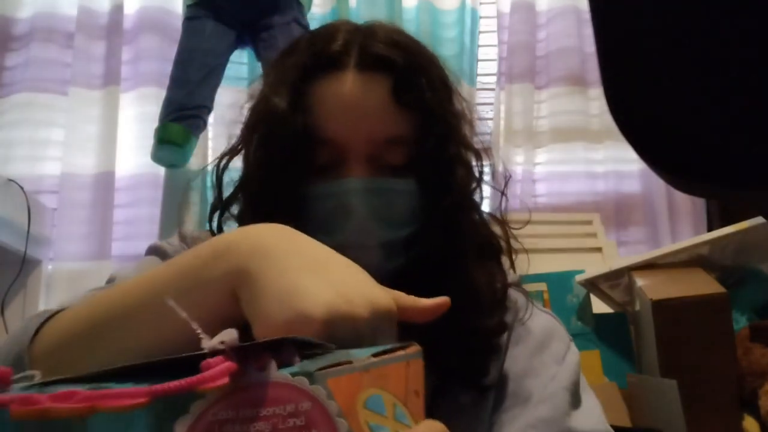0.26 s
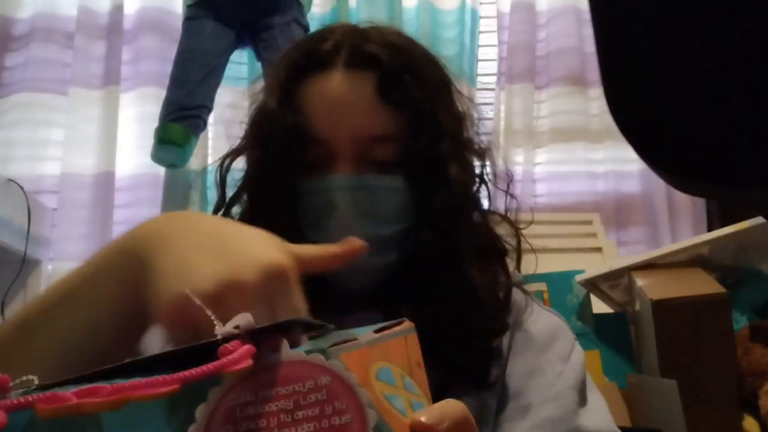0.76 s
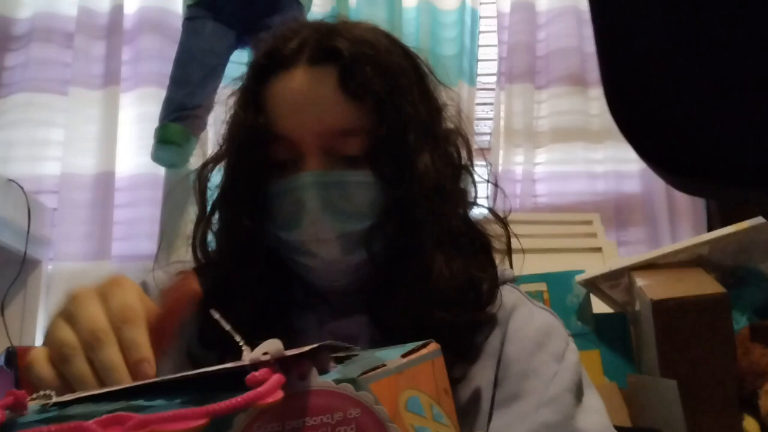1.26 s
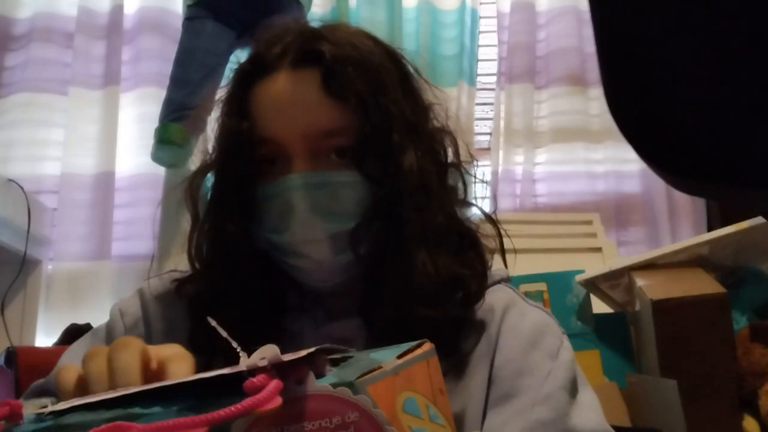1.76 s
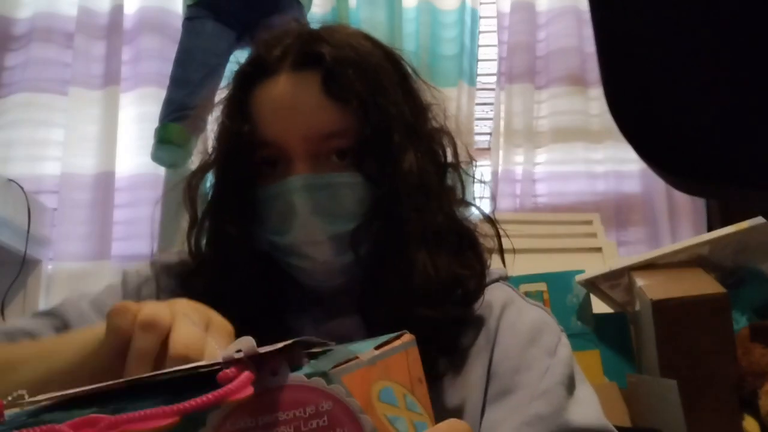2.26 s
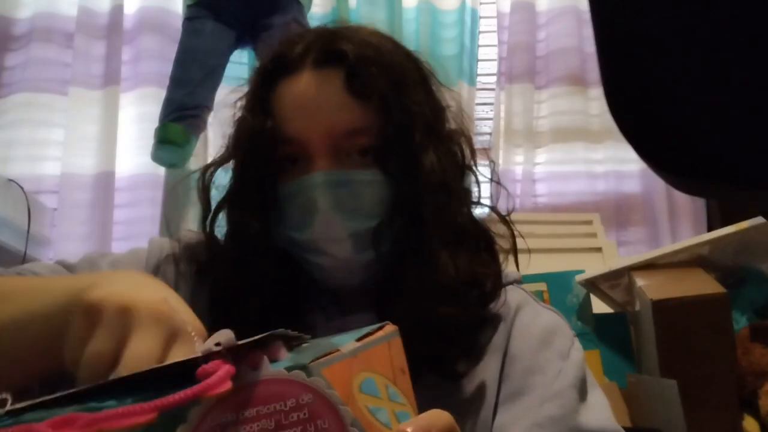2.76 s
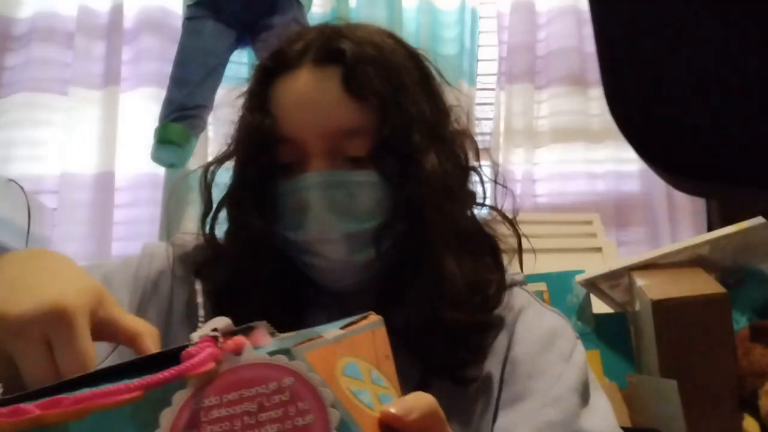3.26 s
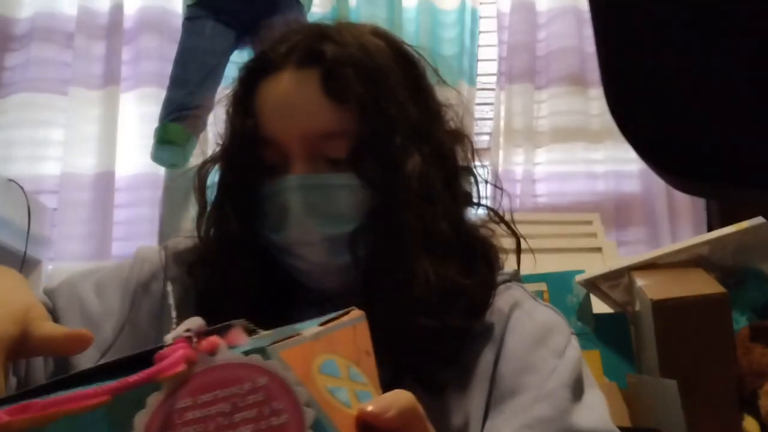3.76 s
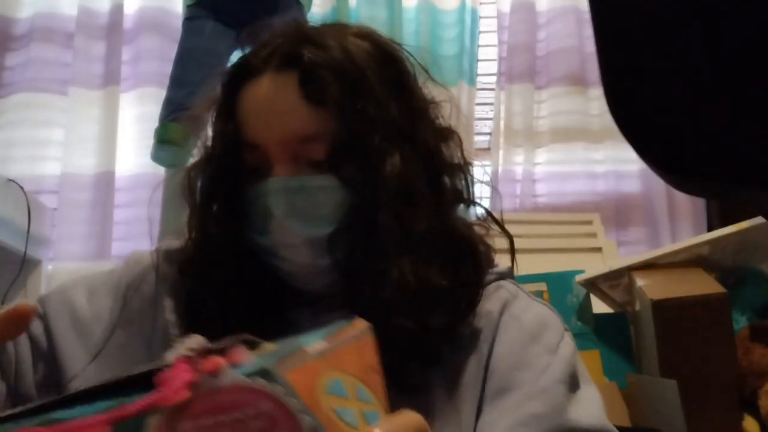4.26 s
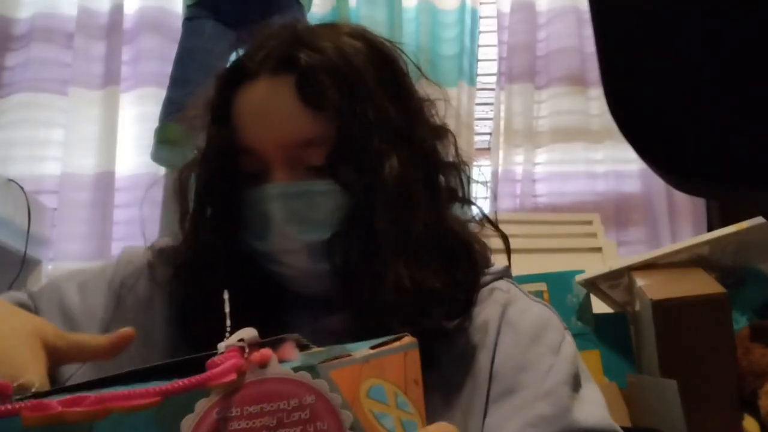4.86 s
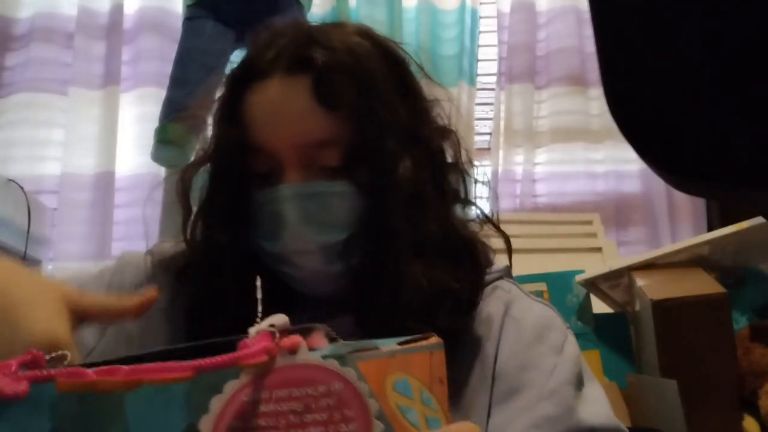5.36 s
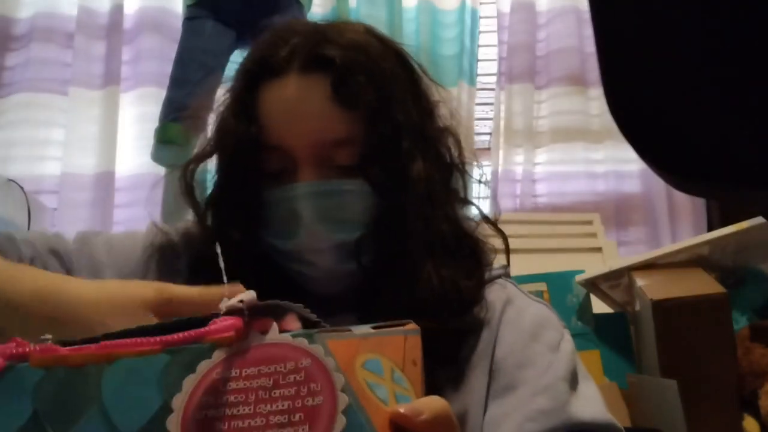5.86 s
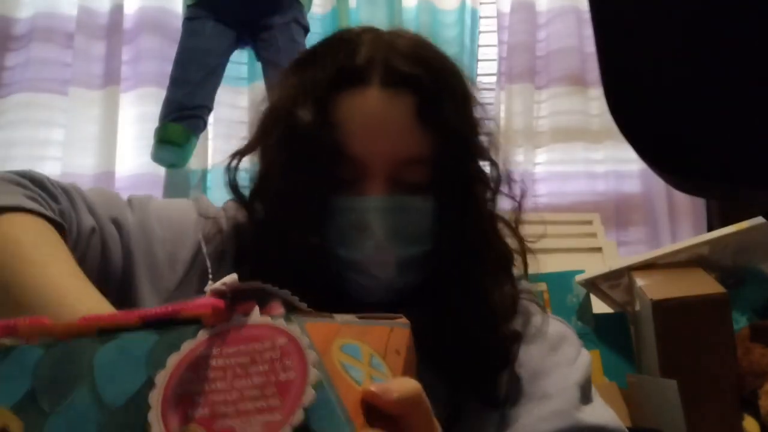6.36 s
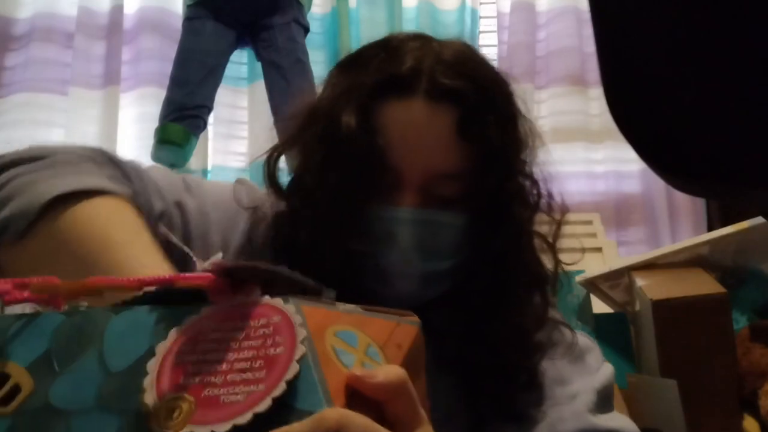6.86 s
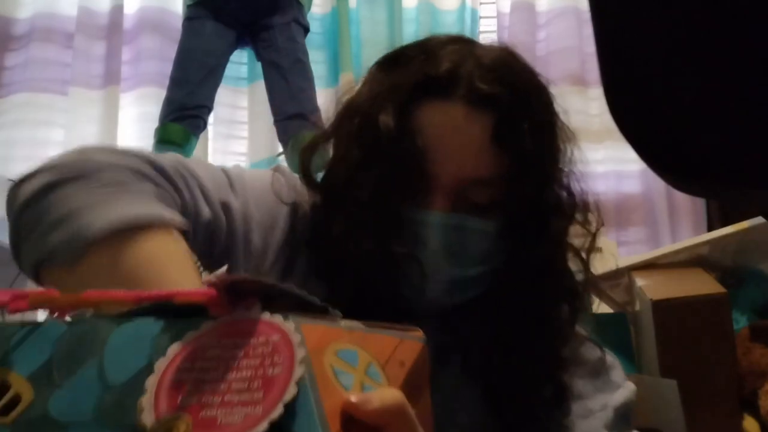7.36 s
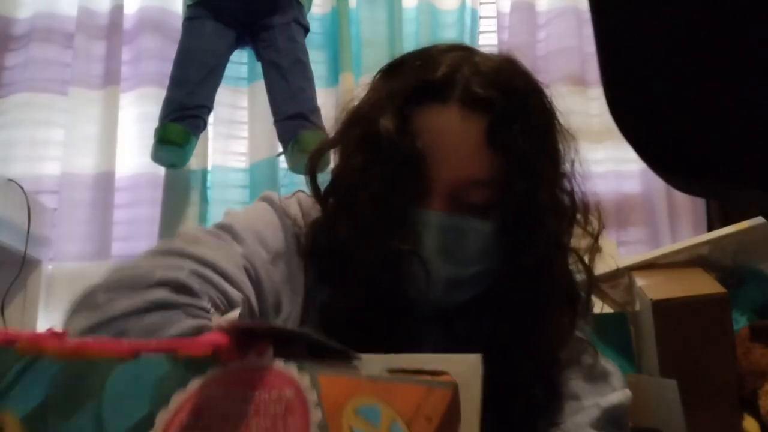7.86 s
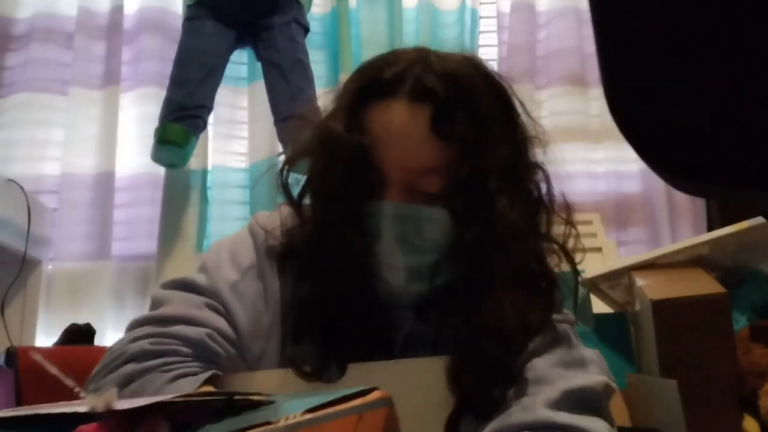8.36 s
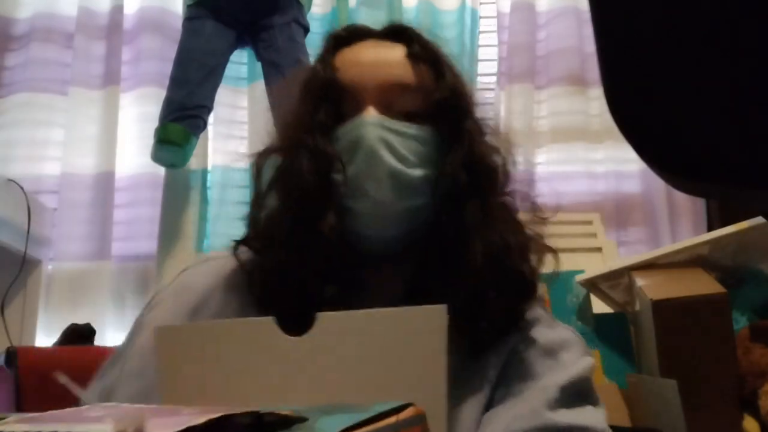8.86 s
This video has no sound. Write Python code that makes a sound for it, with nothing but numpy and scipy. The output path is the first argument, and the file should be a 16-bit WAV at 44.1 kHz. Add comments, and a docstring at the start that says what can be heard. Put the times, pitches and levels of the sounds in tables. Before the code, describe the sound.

Close indoors, fingers tap, scrape and snap a hollow cardboard box, then rip its tab and pull it open with a loud coarse tear.

```python
"""A small, furnished room: a cardboard toy box is opened by hand close to the microphones.
Fingers tap and scrape the card, its tab gives way in snaps and short rips, and the inner tray slides out.
Snaps and taps are bursts of tiny breaks; strokes are random slips over hissing, rubbing fibres.
Both sound through the whole box, the air in it, its walls, its stiff panels and its surface fibres."""
import sys
import numpy as np
from scipy import signal
from scipy.fft import rfft, irfft, next_fast_len
from scipy.io import wavfile
from scipy.ndimage import map_coordinates

SR = 44100
rng = np.random.default_rng(int(sys.argv[2]) if len(sys.argv) > 2 else 0)


def log_audio(samples):
    """Write samples as a 16-bit WAV file to the path given in sys.argv[1]."""
    # one column per channel
    frames = np.atleast_2d(samples).T
    # limit to full scale, then quantise
    limited = np.clip(frames, -1, 1)
    pcm = np.round(limited * 32767).astype(np.int16)
    wavfile.write(sys.argv[1], SR, pcm)


N = 402191
RING = 10000  # length of every response (samples)


def amp(db):
    """Gain of a level in dB."""
    return 10 ** (np.asarray(db) / 20)


def unit(x):
    """x at rms 1."""
    return x / np.sqrt(np.mean(x ** 2) + 1e-20)


def along(points, hz):
    """Curve through (f/Hz, value) points, read on a log frequency axis."""
    f, v = np.transpose(points)
    return np.interp(np.log(hz + 1), np.log(f + 1), v)


def wobble(rate, size):
    """A smooth random curve with rate knots a second."""
    knots = rng.standard_normal(int(size * rate / SR) + 4)
    return map_coordinates(knots, [np.arange(size) * rate / SR])


def filtered(x, response):
    """x times a response of frequency."""
    size = next_fast_len(x.shape[-1] + RING)
    spectrum = rfft(x, size) * response(np.fft.rfftfreq(size, 1 / SR))
    return irfft(spectrum, size)[..., :x.shape[-1]]


def causal(gain):
    """The minimum-phase response with this gain, by folding its cepstrum onto positive times."""
    cepstrum = irfft(np.log(np.maximum(gain, 1e-6)))
    cepstrum[1:RING // 2] *= 2
    cepstrum[RING // 2 + 1:] = 0
    return np.exp(rfft(cepstrum))


# spectrum of the still room: (f/Hz, level/dB)
AIR_TONE = [(25, -31), (50, -6.5), (90, 1), (185, -8), (363, -10.5), (840, -17), (1900, -21), (2800, -21),
            (7300, -30.5), (15500, -35)]


def air():
    """The still room is steady shaped noise, nearly the same at both microphones in the bass."""
    noise = rng.standard_normal((2, N))
    mid, side = unit(filtered(noise, lambda hz: amp(along(AIR_TONE, hz))))
    side_db = [(100, -9.5), (400, -3), (1500, -0.5)]  # (f/Hz, level/dB)
    side = filtered(side, lambda hz: amp(along(side_db, hz)))
    return amp(-70.5) * np.array([mid, side])


def resonator(modes, hz, edge_hz):
    """Gain of a set of modes that fades away below the lowest one and above an edge."""
    power = 0
    for centre, width, db in modes:
        mode = amp(db) * hz * width / (centre * centre - hz * hz + 1j * hz * width)
        power = power + np.abs(mode) ** 2
    below = (0.9 * modes[0][0] / (hz + 1)) ** 12
    above = (hz / edge_hz) ** 8
    return np.sqrt(power / (1 + above) / (1 + below))


# the push of a finger on the whole box: (f/Hz, level/dB)
THUMP_TONE = [(25, -21.5), (45, -20.5), (65, 0), (100, -2), (135, 1), (190, 6), (235, -17.5), (700, -73)]
# resonances of the air in the box: (f/Hz, width/Hz, level/dB)
CAVITY_MODES = [(297.4, 87, 1.5), (316, 33, -5.5), (389, 57, -1), (417, 42, -4.5), (493, 12, -1.5)]
# resonances of its large walls: (f/Hz, width/Hz, level/dB)
WALL_MODES = [(619.4, 51, -1.5), (683.5, 39, 1), (714, 14, -2.5), (779, 69, -1), (1121, 160, -6.5)]
# tone of the stiff panels: (f/Hz, level/dB)
PANEL_TONE = [(500, -47.5), (950, -1.5), (1120, 9), (1260, -0.5), (1370, 2), (1520, 2), (1640, -1.5),
              (1850, 1.5), (2150, 0.5), (2450, 1.5), (3200, -6), (4200, -22.5), (6000, -34.5),
              (12000, -62.5)]
# tone of the fibres at the surface: (f/Hz, level/dB)
FIBRE_TONE = [(1800, -45.5), (3500, 7), (5000, 5), (8000, 1), (11500, -3.5), (15000, -2.5)]


def radiators():
    """Responses of the five parts: whole box, the air in it, its walls, its panels and its fibres."""
    hz = np.fft.rfftfreq(RING, 1 / SR)
    thump, panel, fibre = (amp(along(tone, hz)) for tone in (THUMP_TONE, PANEL_TONE, FIBRE_TONE))
    cavity = resonator(CAVITY_MODES, hz, edge_hz=568)
    walls = resonator(WALL_MODES, hz, edge_hz=1023)
    return np.array([causal(gain) for gain in (thump, cavity, walls, panel, fibre)])


# how long the room's tail takes to fall by 60 dB: (f/Hz, time/s)
ROOM_DECAY = [(100, 0.21), (260, 0.33), (700, 0.11), (2000, 0.15), (5000, 0.14), (13000, 0.16)]
# the room's tail; so close to the box, its low notes outweigh the room: (f/Hz, level/dB)
ROOM_LEVEL = [(100, -6), (280, -7.5), (700, -4), (1200, -0.5), (4000, -2.5)]
# side gain of the reflections: (f/Hz, level/dB)
ROOM_WIDTH = [(100, -8.5), (300, -8), (550, -8.5), (1000, 2), (2000, -1), (4000, 0.5), (14000, 1)]


def room():
    """Mid and side response from one spot on the box: direct sound, then a decaying noise tail."""
    hz, t, z = signal.stft(rng.standard_normal((2, RING)), SR, nperseg=256)
    decay = amp(-60 * t / along(ROOM_DECAY, hz)[:, None])
    tail = signal.istft(z * decay, SR, nperseg=256)[1][:, :RING]
    tail *= 1 - np.exp(-np.arange(RING) / SR / 0.0021)  # the reflections build up gradually
    hz = np.fft.rfftfreq(RING, 1 / SR)
    mid, side = rfft(tail / np.linalg.norm(tail[0])) * amp(along(ROOM_LEVEL, hz))
    side = side * amp(along(ROOM_WIDTH, hz))
    delays = rng.integers([[0], [0]], [[7], [9]])  # samples to each microphone; the left is mostly nearer
    left, right = np.exp(-2j * np.pi * hz * delays / SR)
    return np.array([(left + right) / 2 + mid, (left - right) / 2 + side])


EDGE_DB = 27  # a stroke rises and falls by this much at its ends
FIBRE_GROWTH = 1.5  # dB of fibre noise for each dB of brightness


def gesture(row, attack_s, sag_db, release_s):
    """(t/s, effort/dB, brightness/dB) course of one stroke: it bites, eases off by sag_db and lets go."""
    s, length, db, bright = row
    full = s + attack_s / 2
    end = max(s + length, full + 0.005)
    times = [full - attack_s, full, end, end + release_s]
    first, last = db + sag_db / 2, db - sag_db / 2
    levels = (first - EDGE_DB, first, last, last - EDGE_DB)
    return [(t, level, bright) for t, level in zip(times, levels)]


def stroke(rows, parts, slip_rate, spread_db, hiss, flutter_db, trim_db):
    """Card catches and lets go at random moments, slip_rate a second, over the hiss of rubbing fibres."""
    s, effort_db, bright_db = np.transpose(rows)
    size = int((s[-1] - s[0]) * SR)
    t = s[0] + np.arange(size) / SR
    slip_db = spread_db * np.clip(rng.standard_normal(size), -2, 2)
    slips = (rng.random(size) < slip_rate / SR) * amp(slip_db)
    # each slip breaks a bundle of fibres, dying away over about a millisecond
    bursts = signal.lfilter([1], [1, -np.exp(-1 / (0.0011 * SR))], slips)
    rubbing = (unit(bursts) + hiss) * rng.standard_normal(size)
    force = unit(rubbing * amp(flutter_db * wobble(45, size)))
    force *= np.clip(np.minimum(t - s[0], s[-1] - t) / 0.0079, 0, 1)
    panel_db, fibre_db = effort_db + bright_db, effort_db + FIBRE_GROWTH * bright_db
    part_db = (effort_db, effort_db, effort_db, panel_db, fibre_db)
    drive = np.array([force * amp(np.interp(t, s, db) + trim) for db, trim in zip(part_db, trim_db)])
    out = np.zeros((2, N + 3 * RING))
    for start in range(0, size, RING):  # the contact travels, so its paths through the room keep changing
        ring = irfft(parts[:, None] * room())
        ring /= np.linalg.norm(ring[:, :1], axis=2, keepdims=True)
        piece = rfft(drive[:, None, start:start + RING], 2 * RING)
        sound = irfft((piece * rfft(ring, 2 * RING)).sum(0))
        out[:, max(round(s[0] * SR), 0) + start:][:, :2 * RING] += sound
    return out[:, :N]


# fingers scrape over the card: (t/s, length/s, effort level/dB, brightness level/dB)
SCRAPE_STROKES = [(0.0, 0.036, -39.5, 6.5), (0.097, 0.077, -51, -8), (0.24, 0.062, -45, -4),
                  (0.45, 0.14, -44.5, 2), (0.743, 0.059, -46, -1), (0.772, 0.07, -36, -1),
                  (1.085, 0.026, -47, -1.5), (1.322, 0.035, -58, 3), (1.373, 0.029, -53, 4.5),
                  (1.598, 0.11, -59.5, 0), (1.765, 0.067, -54, 2), (1.918, 0.054, -55.5, -0.5),
                  (2.198, 0.056, -52, 0.5), (2.421, 0.1, -42.5, -2.5), (2.783, .06, -50, -0.5),
                  (3.123, 0.095, -46, 2.5), (3.862, .08, -50, -22), (4.388, .14, -42, -10),
                  (6.573, .035, -41, 1.5), (8.345, 0.042, -42, 0)]


def scrapes(parts):
    """Fingertips drag over the card in dense, fine slips."""
    return sum(stroke(gesture(row, attack_s=0.016, sag_db=3.0, release_s=0.032), parts,
                      slip_rate=520, spread_db=4, hiss=0.4, flutter_db=0.5,
                      trim_db=[-15, -7, -6.5, -8.5, -22.5]) for row in SCRAPE_STROKES)


# the grip shifts on the creaking card: (t/s, length/s, effort level/dB, brightness level/dB)
GRIP_SHIFTS = [(0.0, 0.53, -62, 4.5), (0.662, .1, -68, 1), (1.121, 0.094, -66, 2), (1.58, 0.95, -63.5, 0),
               (2.551, 0.29, -66, 3.5), (2.852, 0.16, -62, -1.5), (3.06, .09, -56, -2),
               (3.399, 0.81, -67.5, -1), (4.51, 0.21, -63.5, 9.5), (6.51, 0.43, -56, 3),
               (6.951, 0.24, -57.5, 4), (7.998, .13, -64.5, 1), (8.295, .04, -62.5, 5.5),
               (8.447, 0.19, -70.5, 5), (8.988, .13, -67.5, 9)]


def grip(parts):
    """The hold shifts and the card creaks in sparse, equal slips."""
    return sum(stroke(gesture(row, attack_s=0.04, sag_db=2.5, release_s=0.07), parts,
                      slip_rate=46, spread_db=0, hiss=0.71, flutter_db=1.5,
                      trim_db=[-20, -5.0, -6.5, -7.5, -15]) for row in GRIP_SHIFTS)


WALL_TRADE = 0.24  # the walls take up what misses the cavity (dB per dB)


def blow(out, parts, s, rise_s, fall_s, part_db):
    """Add a burst of tiny random breaks that shakes each part of the box at its own level."""
    t = np.arange(RING) / SR
    lead = 0.008  # the burst swells this long before its peak (s)
    swell = amp(-60 * np.maximum((lead - t) / rise_s, (t - lead) / fall_s))
    breaks = rng.standard_normal(RING) * amp(2.7 * rng.standard_normal(RING))
    fade = np.minimum(1, 2 * (1 - t / t[-1]))
    ring = irfft(parts[:, None] * rfft(breaks * swell) * room()) * fade
    ring /= np.sqrt(np.sum(ring[:, :1] ** 2, axis=2, keepdims=True) / (0.021 * SR))
    out[:, max(round((s - 0.0055) * SR), 0):][:, :RING] += np.tensordot(amp(part_db), ring, 1)


# creases buckle and the tab's perforations break:
# (t/s, level/dB, cavity share level/dB, panel share level/dB, fibre share level/dB)
SNAP_BLOWS = [(0.005, -33, -15, -3, -9.5), (0.019, -39.5, -14, -7, -5), (0.044, -41, -21, -9, -7),
              (0.126, -35, -7, 1, -7.5), (0.168, -42, -22, -3.5, -12.5), (0.233, -40, -5, 4.5, -5.5),
              (0.269, -27, -18, -4, -18.5), (0.315, -25, -16, -5.5, -20.5), (0.413, -51, -10, -16, -1.5),
              (0.807, -22.5, -17, -10.5, -48), (1.16, -65, -10, 6, -2), (1.406, -54.5, -15, 4, -9),
              (1.632, -54.5, -9, 3, -2), (1.707, -49.5, -6, 2, -7.5), (1.823, -52, -7, -13, -19),
              (2.184, -26.5, -9, -17.5, -30.5), (2.543, -39, -3, -1.5, -16.5), (2.587, -41, -9, -13, -21),
              (2.62, -39.5, -7, -5, -13), (2.696, -33, -9.5, -9, -23), (2.767, -24.5, -7.5, -9, -19),
              (3.158, -36, -12, -12, -15.5), (3.237, -19.5, -11, -8.5, -26.5),
              (3.261, -5.5, -16.5, -15.5, -32.5), (3.535, -40, -16, -10, -17), (3.671, -32.5, -8, -11, -20),
              (3.793, -28, -8.5, -10, -17.5), (3.863, -30, -7, -10, -18.5),
              (4.068, -31, -5.5, -10.5, -13.5), (4.302, -23.5, -8.5, -16, -13.5),
              (4.313, -22.5, -3, -10, -15.5), (4.369, -23, -4, -8, -18.5), (4.588, -24, -4.5, -6, -16),
              (4.625, -28, -0.5, -7, -13.5), (4.653, -19.5, -6, -9.5, -16.5), (4.667, -20, -3.5, -7.5, -15),
              (4.774, -29.5, -3.5, -15.5, -20.5), (4.836, -16, -7.5, -18, -19.5),
              (4.87, -9, -10.5, -19, -25.5), (4.882, -10, -20.5, -14.5, -19.5),
              (4.893, -11, -21, -14, -22.5), (5.518, -51, -7, -3.5, -1), (6.206, -35, -14, -1, -13),
              (6.232, -25.5, -16, -1.5, -10), (6.256, -24.5, -17, -2, -11.5), (6.309, -31.5, -11, -4, -20),
              (6.613, -16.5, -22, -10, -20), (6.66, -27, -8.5, 2.5, -12), (6.698, -28.5, -11, -1, -9.5),
              (6.776, -20.5, -8.5, -3, -14), (6.854, -36, -4.5, -3.5, -11.5), (7.023, -25, -4, -11, -18),
              (7.182, -25, -12.5, -3.5, -25), (7.214, -14.5, -7.5, -4, -17), (7.282, -3.5, -16, -18.5, -27),
              (7.372, -11, -11.5, -13, -26), (7.389, -11, -14, -12, -28), (7.47, -20, -11, -7.5, -20.5),
              (7.528, -13, -16, -12.5, -27), (7.575, -11.5, -13, -5.5, -17), (7.643, -6, -7.5, -10, -19.5),
              (7.679, -16, -6.5, -4.5, -15.5), (7.982, -55.5, -12, -4, 2.5), (8.845, -75.5, -9, 5, 4),
              (8.882, -75.5, -6, 8, 2), (9.089, -46.5, -7.5, 2.5, -2.5)]
# what a snap gives the whole box, cavity, walls, panels and fibres: (level/dB) each
SNAP_PARTS = [-20.5, -7, -16, -6.5, -5.5]


def snaps(parts):
    """A crease buckles in a burst of breaks: its fibres start to give before it lets go."""
    out = np.zeros((2, N + RING))
    for s, db, cavity, panel, fibre in SNAP_BLOWS:
        shares = np.array([cavity, cavity, -WALL_TRADE * cavity, panel, fibre])
        # rise and fall are the times for 60 dB
        blow(out, parts, s, rise_s=0.012, fall_s=0.021, part_db=db + shares + SNAP_PARTS)
    return out[:, :N]


# fingers and loose flaps knock on the box:
# (t/s, level/dB, cavity share level/dB, hardness level/dB, thump share level/dB)
TAP_BLOWS = [(0.58, -21.5, -14.5, -24, -25), (0.854, -43.5, -24, -14, -3), (1.078, -40.5, -0.5, -9, -13.5),
             (1.272, -47, -17, -22, -33), (1.521, -53, -4, -14, -33), (1.886, -32, -9, -17, -35),
             (2.414, -26, 0, -19.5, -16), (2.443, -36, -2.5, -5.5, -13), (2.51, -33, -3.5, -19, -19),
             (3.071, -45, -3.5, -9, -20), (3.511, -27.5, -11, -17.5, -31), (3.652, -28, -9.5, -19.5, -28),
             (3.764, -40, -8, -28, -20), (3.778, -30.5, -7.5, -24, -25), (3.924, -39.5, -9, -28, -32),
             (3.993, -39, -9.5, -37, -29), (4.384, -25, -13, -12, -29), (4.485, -32, -7.5, -19.5, -19),
             (5.02, -48, -5, -15, -7.5), (5.621, -43.5, 1, -5.5, -26), (5.984, -46.5, -4.5, -7, -29),
             (6.457, -42.5, -14, -21, -29), (7.053, -30.5, -10.5, -8.5, -23.5), (7.33, -12, -12, -22, -34),
             (7.761, -18.5, -23, -23, -36), (7.78, -25, -25, -16.5, -26.5), (7.834, -30.5, -25, -15, -24),
             (7.86, -32.5, -5, -12, -21), (7.929, -32, -5, -13, -26), (8.389, -33, -6.5, -15, -42)]
# what a tap gives the whole box, cavity, walls, panels and fibres: (level/dB) each
TAP_PARTS = [1.5, -4.5, -17.5, -6.5, -20.5]


def taps(parts):
    """A knock shakes the box in a burst of breaks; a harder one drives panels and fibres more."""
    out = np.zeros((2, N + RING))
    for s, db, cavity, hard, thump in TAP_BLOWS:
        shares = np.array([thump, cavity, -WALL_TRADE * cavity, hard, hard])
        blow(out, parts, s, rise_s=0.012, fall_s=0.026, part_db=db + shares + TAP_PARTS)
    return out[:, :N]


# short rips along the tab: (t/s, length/s, effort level/dB, brightness level/dB)
RIP_STROKES = [(4.299, .035, -34.5, -4), (4.586, 0.069, -41, 0), (4.843, .06, -25, 1),
               (6.209, 0.1, -36.5, 1.5), (6.611, 0.093, -32.5, 6), (6.741, 0.077, -36, 4.5)]


def rips(parts):
    """The tab tears in coarse slips with a quick bite."""
    return sum(stroke(gesture(row, attack_s=0.006, sag_db=1, release_s=0.033), parts,
                      slip_rate=280, spread_db=3, hiss=0.49, flutter_db=2.0,
                      trim_db=[-25.5, -8, -5.5, -10.5, -19.0]) for row in RIP_STROKES)


# the tray sliding in its sleeve: (t/s, effort level/dB)
SLIDE_COURSE = [(5.041, -81), (5.1, -69), (5.27, -59.5), (5.5, -60), (5.7, -55), (5.92, -61), (6.03, -56),
                (6.14, -61), (6.21, -46), (6.38, -57.5), (6.48, -71)]


def slide(parts):
    """The tray rubs along its sleeve: strong, smooth hiss covers the slips."""
    return stroke([(s, db, 0) for s, db in SLIDE_COURSE], parts,
                  slip_rate=250, spread_db=4.0, hiss=1.9, flutter_db=-0.3,
                  trim_db=[-31, -6, -4.5, -4, -6.3])


# the long pull that frees the flap: (t/s, effort level/dB, brightness level/dB)
PULL_COURSE = [(7.165, -42, -4.5), (7.185, -28.5, 7), (7.235, -23.5, 7), (7.3, -27, 2), (7.35, -34.5, -2.5),
               (7.41, -28.5, 8), (7.46, -35, -3), (7.54, -19.5, -5), (7.6, -19.5, 3.5), (7.7, -19, 0),
               (7.74, -38.5, -6), (7.82, -41, -0.5), (7.92, -40, -2.5), (7.98, -66, 8.5)]


def pull(parts):
    """One long tear in coarse slips, with changing effort and brightness."""
    return stroke(PULL_COURSE, parts, slip_rate=250, spread_db=1.5, hiss=0.55, flutter_db=0.5,
                  trim_db=[-21.5, -6.5, -6.0, -9.0, -18.5])


# where the hands work: (t/s, left-right level/dB)
HAND_PLACE = [(0, .8), (2.2, 0.6), (3, 1), (4.3, 1), (5.6, 1), (6.3, -0.2), (7.201, 0.3), (8.499, 0.5)]


def scene():
    """Scrapes, creaks, snaps, taps, rips, sliding and the pull on one box, over the still room."""
    parts = radiators()
    handling = scrapes(parts) + grip(parts) + snaps(parts) + taps(parts)
    opening = rips(parts) + slide(parts) + pull(parts)
    mid, side = handling + opening + air()
    pan_db = np.interp(np.arange(N) / SR, *np.transpose(HAND_PLACE))
    return np.array([(mid + side) * amp(pan_db / 2), (mid - side) * amp(-pan_db / 2)])


def record(dry):
    """The recorder cuts off steeply above its band limit."""
    top_hz = 16330
    return filtered(dry, lambda hz: 1 / (1 + (hz / top_hz) ** 400))


dry = scene()
out = record(dry)
log_audio(out)
```